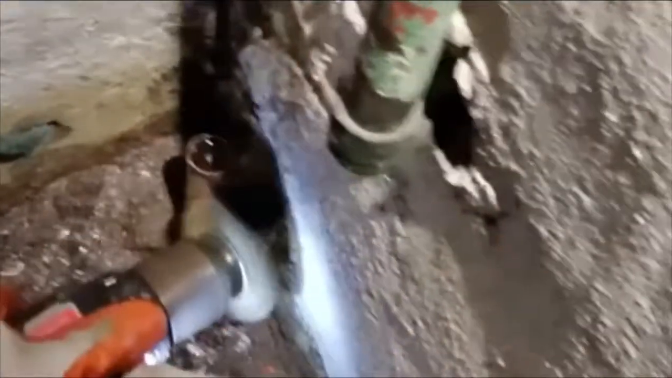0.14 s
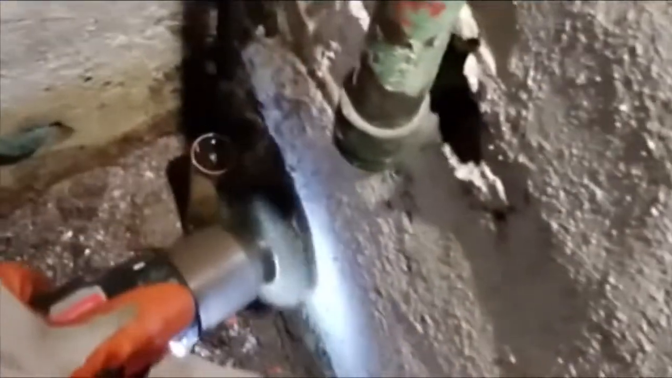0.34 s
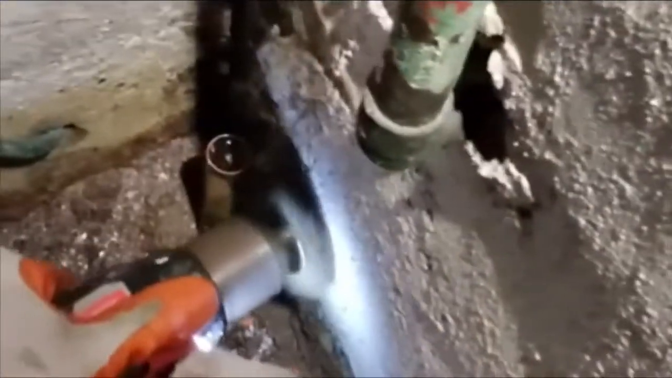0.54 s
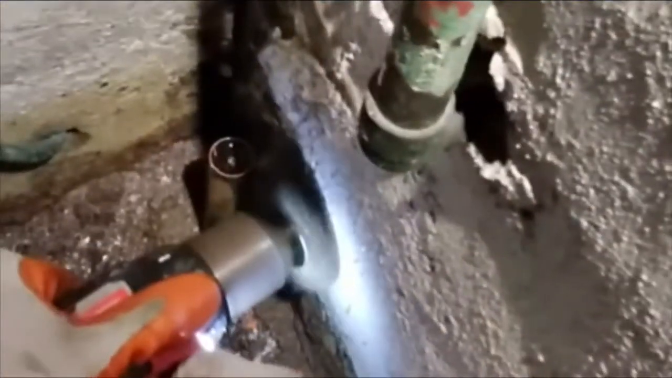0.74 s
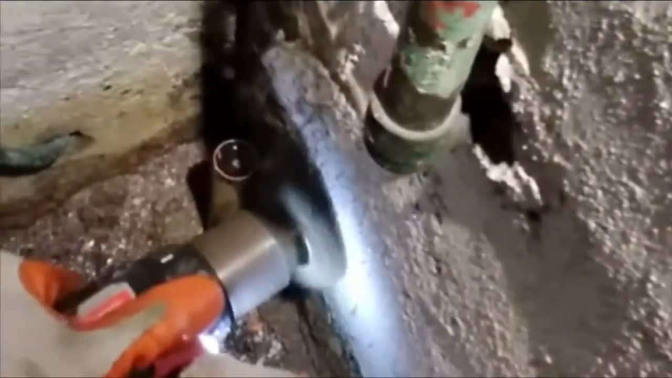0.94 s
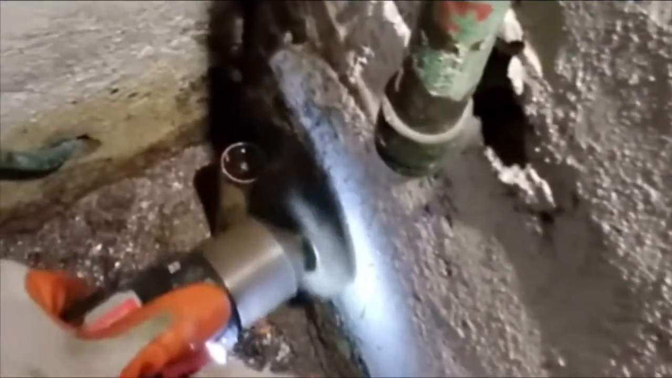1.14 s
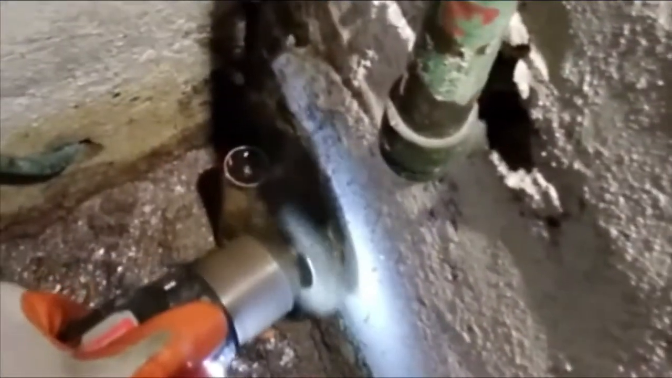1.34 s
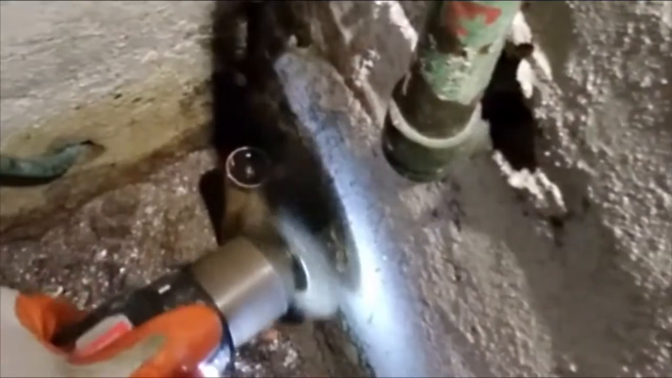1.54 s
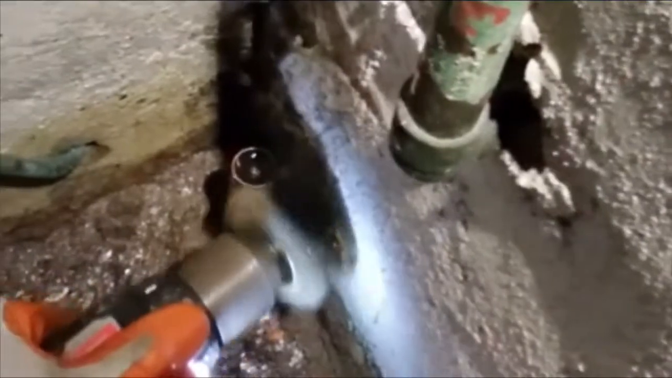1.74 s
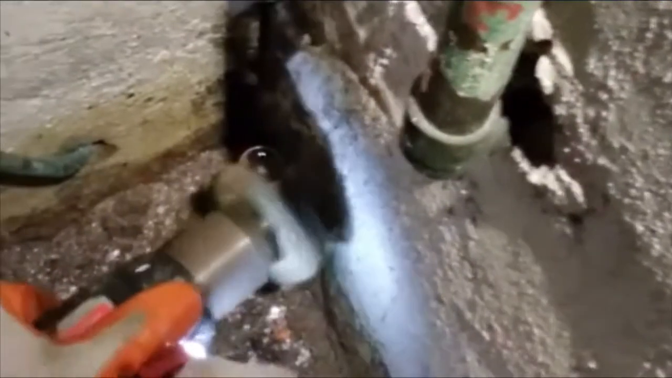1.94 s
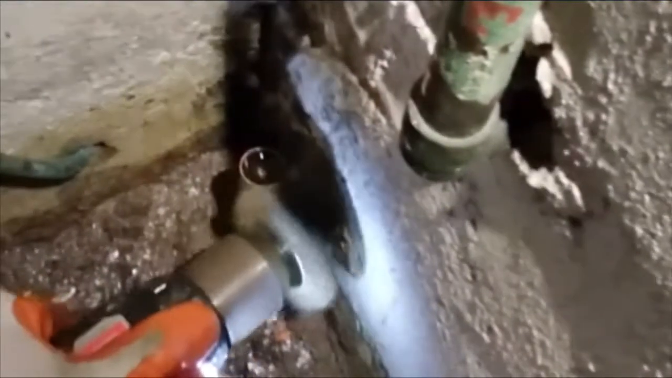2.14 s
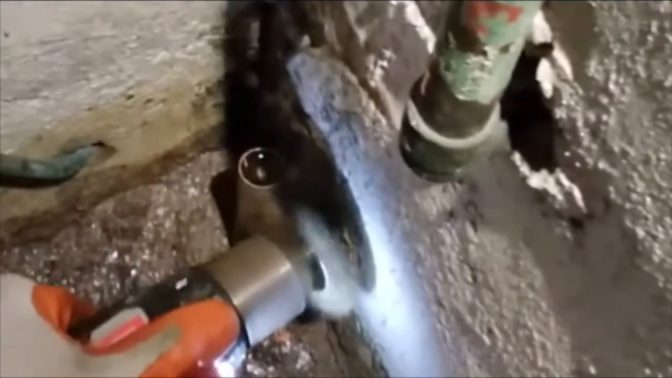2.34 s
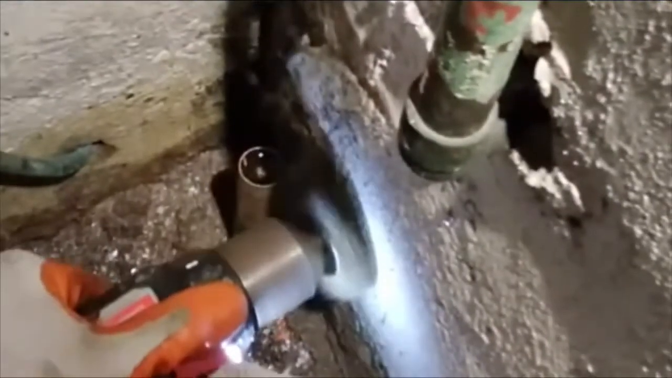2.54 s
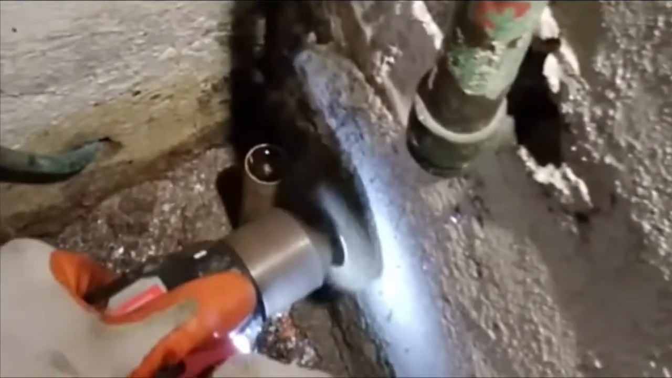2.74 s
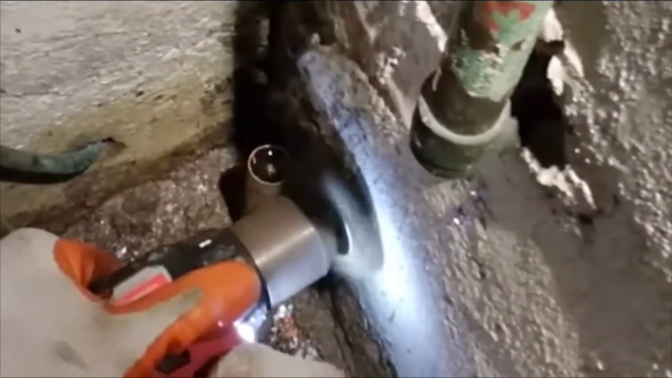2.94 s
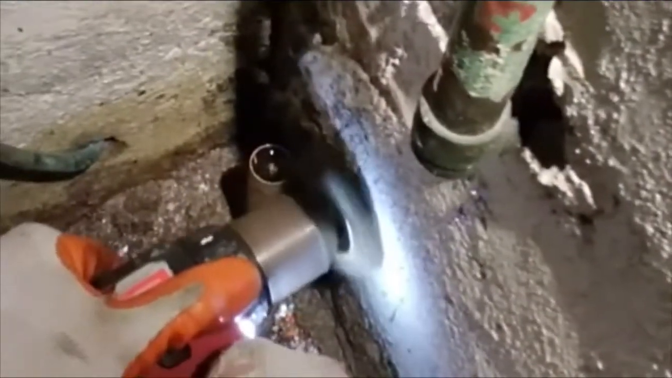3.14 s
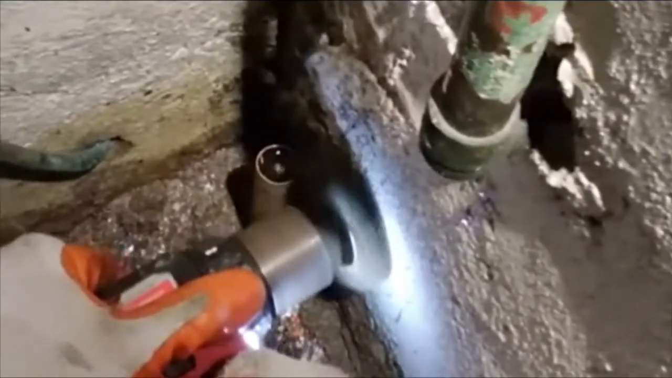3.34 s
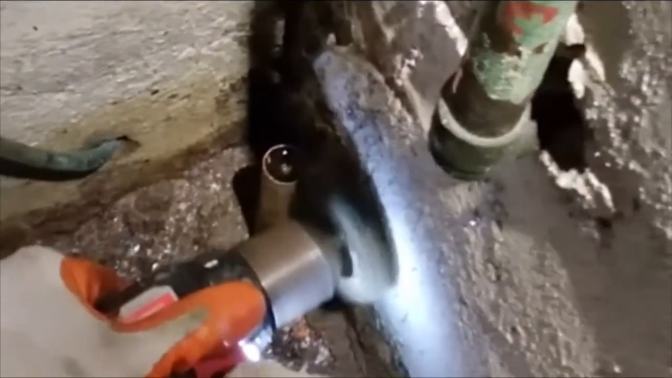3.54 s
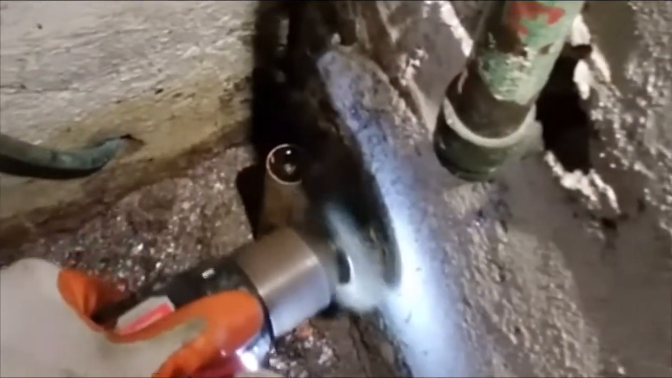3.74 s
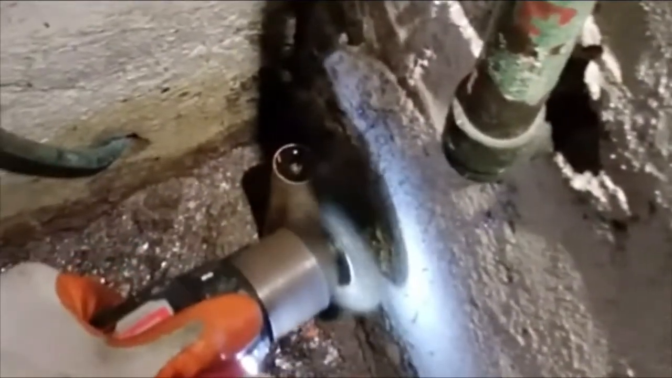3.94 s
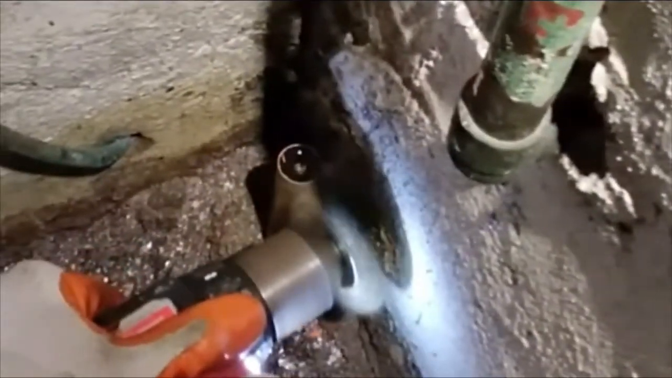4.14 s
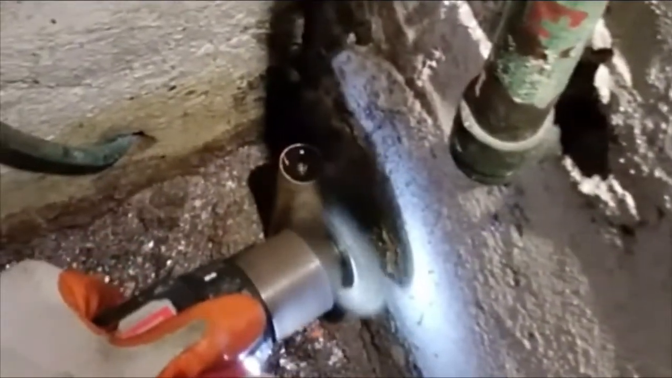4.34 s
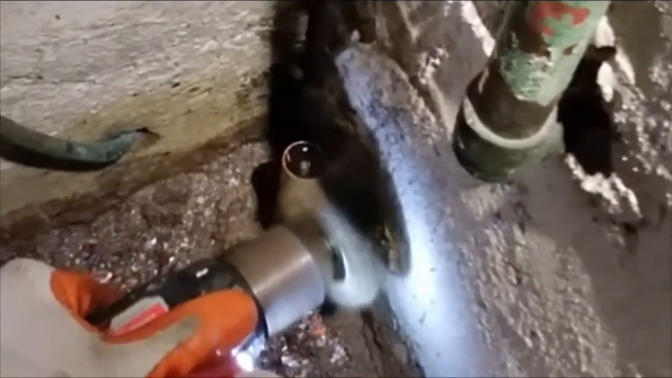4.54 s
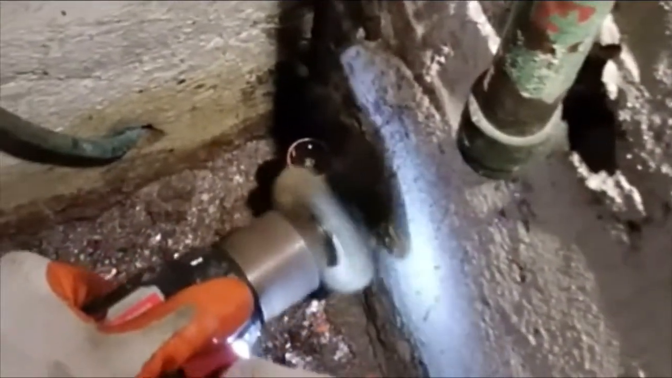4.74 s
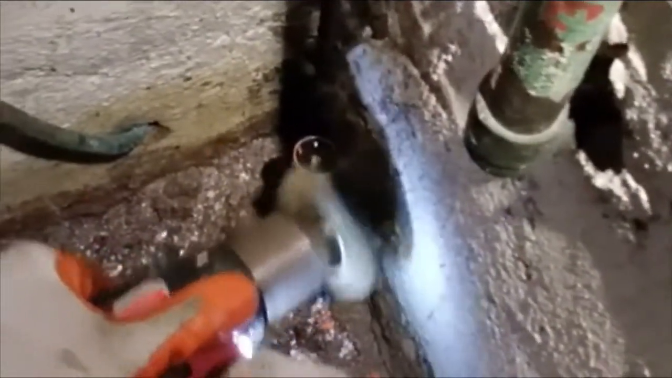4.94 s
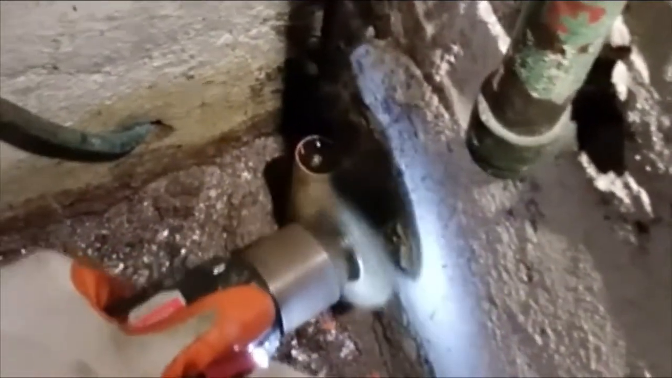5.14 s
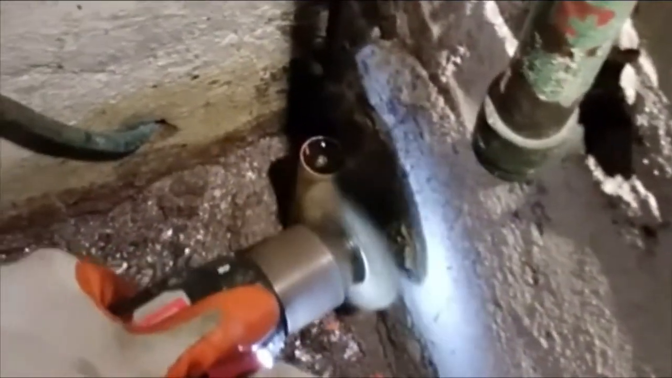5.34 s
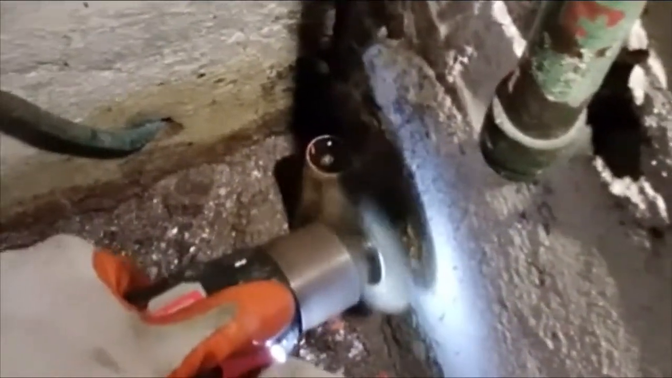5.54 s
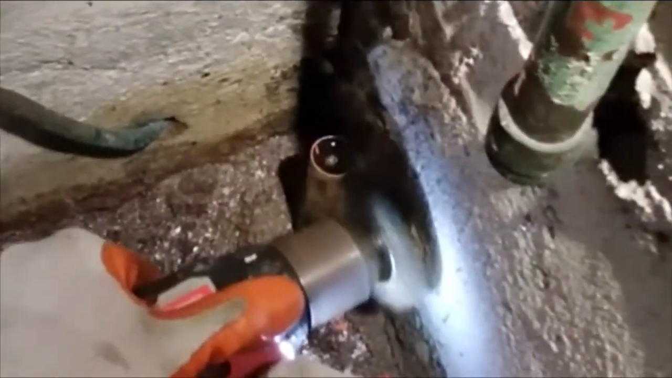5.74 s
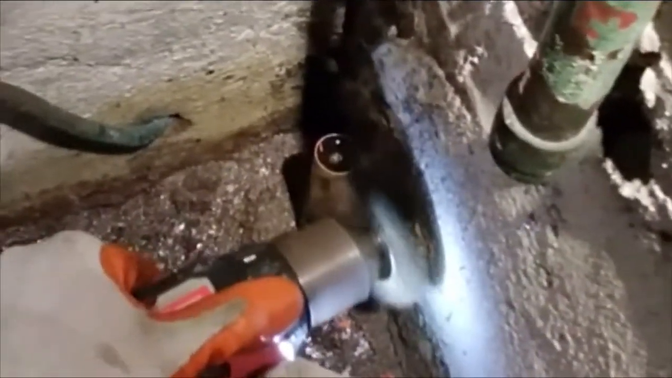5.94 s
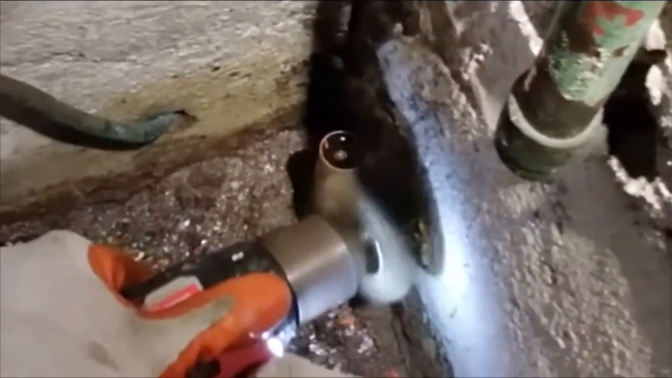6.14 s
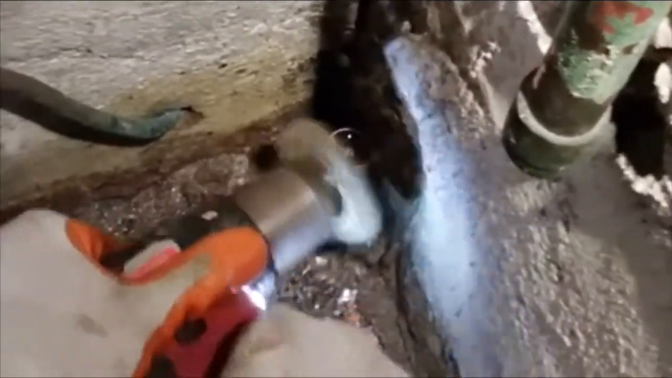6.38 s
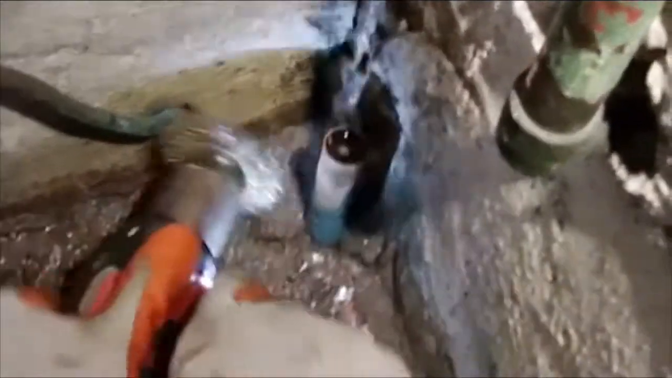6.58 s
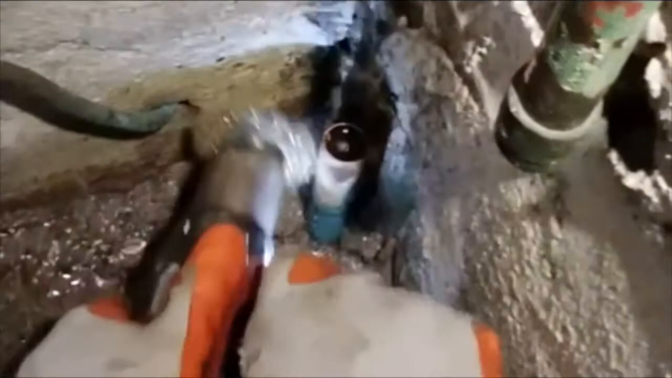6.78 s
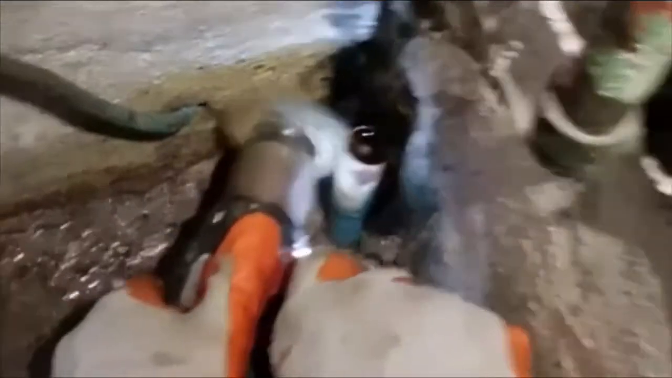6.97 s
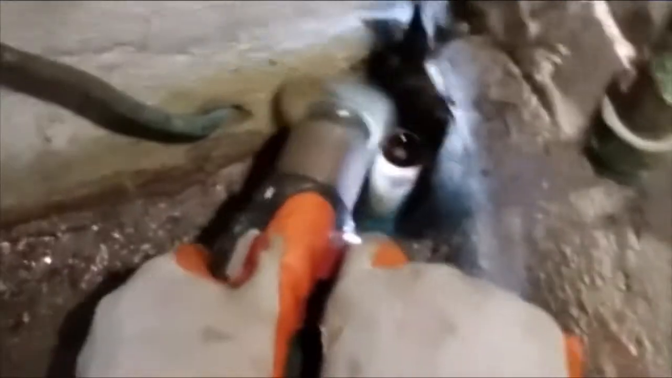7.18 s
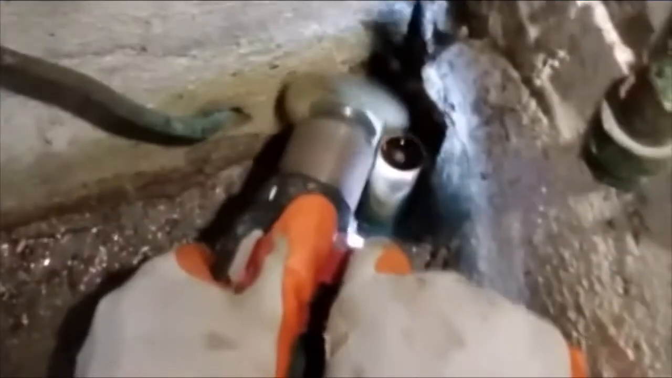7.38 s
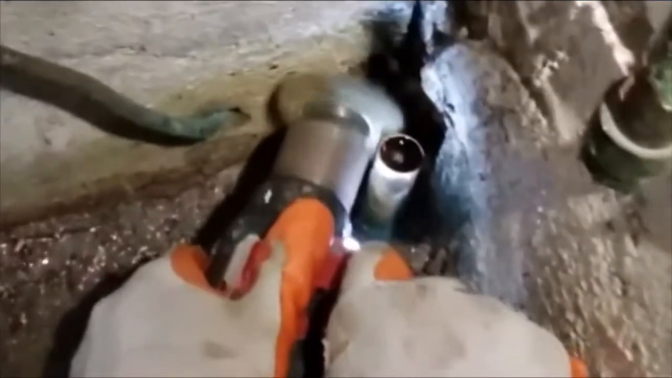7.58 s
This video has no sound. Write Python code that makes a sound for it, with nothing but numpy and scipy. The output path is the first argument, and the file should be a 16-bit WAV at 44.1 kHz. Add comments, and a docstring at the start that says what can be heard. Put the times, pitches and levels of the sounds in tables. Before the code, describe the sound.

A phone very near the tool hears a drill start with a dull knock and race up to a steady, strained whine. Wire bristles scrape and hiss against pipe, fluttering about twenty times a second, heavier around three seconds. Near the end the motor stops quickly with a clunk, leaving soft rumble, gritty rustles and one small metallic tap before whine and scraping return. The concrete corner sounds close and dry.

```python
"""A cordless drill spins a wire brush against a metal pipe stub in a concrete corner, close to a phone.
The motor whines on multiples of its shaft speed, and gear lines and a noisy rush follow that speed.
Random wire blows ring the pipe's modes, scratch and hiss, swelling once a brush turn. The drill brakes,
the still brush rustles and taps the pipe as decaying modes, and the motor spins up again.
Filtered noise makes a low outdoor rumble."""
import sys
import numpy as np
from scipy import signal
from scipy.fft import rfft, irfft, next_fast_len
from scipy.io import wavfile
from scipy.ndimage import uniform_filter1d

SR = 44100
rng = np.random.default_rng(int(sys.argv[2]) if len(sys.argv) > 2 else 0)


def transcribe(u):
    """Save the signal u as a 16-bit wav file named by the first command-line argument.

    u: samples, shape (n,) or (channels, n), limited to [-1, 1]; the rate is SR.
    q: integer samples, one column per channel.
    """
    v = np.clip(np.atleast_2d(u).T, -1, 1)
    q = np.round(v * 32767).astype(np.int16)
    wavfile.write(sys.argv[1], SR, q)


def elevation(decibels):
    """Turn decibel levels (scalar or array-like) into linear amplitude ratios."""
    levels = np.asarray(decibels, float)
    return 10 ** (levels / 20)


N = 335601
TIME_S = np.arange(N) / SR

# Trigger pulls: start_s, gears_catch_after_s, bite_within_s, brake_s, gear_rush_db (before load and speed)
TRIGGER_PULLS = [(.02, 0.01, .003, 6.478, -47), (6.998, 0.0, 0.022, 9, -46)]
# Main whine under load, at three times the shaft: time_s, pitch_hz (at full speed), level_db (before housing)
MAIN_WHINE = [(.06, 968, -36.5), (0.25, 975, -45), (0.32, 970.8, -38.5), (0.47, 965.5, -39.5),
              (0.75, 936.3, -32.5), (1.25, 931.6, -31), (1.77, 933.2, -28.5), (1.85, 941.9, -36.5),
              (2.13, 956.4, -40.5), (2.34, 956, -39.5), (2.8, 931.3, -29), (3.18, 890.3, -34.5),
              (3.81, 920.3, -33), (4.1, 927.5, -28), (4.74, 935, -29.5), (4.79, 941.4, -35.5),
              (5.26, 953.2, -38.5), (5.72, 938.2, -29.5), (5.9, 917.5, -34), (6.07, 919.9, -28.5),
              (6.31, 933.2, -32), (6.45, 963.2, -48), (7.22, 935.3, -35), (7.6, 927, -33.5)]
MAIN_ORDER = 3
FREE_HZ, FULL_LOAD_HZ = 321.86, 15.2  # shaft speed without load; its drop under a firm press


def colour(x, points):
    """Linear filtering: a gain curve, interpolated over log frequency, multiplies the spectrum."""
    hz, db = np.transpose(points)
    n = next_fast_len(N)
    log_f = np.log(np.arange(n // 2 + 1) * SR / n + 1)
    gain = elevation(np.interp(log_f, np.log(hz), db))
    return irfft(rfft(x, n) * gain, n)[..., :N]


def unit(x):
    """Normalisation of mean power: scales a signal to rms 1."""
    return x / np.sqrt(np.mean(x ** 2))


def curve(rows, off=None):
    """Linear interpolation: the columns of a table at every sample, optionally with a value outside it."""
    s, *columns = np.transpose(rows)
    return [np.interp(TIME_S, s, c, off, off) for c in columns]


def walk(rate):
    """Slow random modulation: levels held 1 / rate s and smoothed twice, of spread near 1."""
    k = int(SR / rate)
    held = np.repeat(rng.standard_normal(N // k + 1), k)
    return 1.3 * uniform_filter1d(uniform_filter1d(held, k), k)[:N]


def random_blows(per_s, spread_db, size=(2, N)):
    """Shot noise: impulses at random moments, a few much harder, independent on the two channels by default."""
    blows = (rng.random(size) < per_s / SR) * rng.standard_normal(size)
    hardness = np.minimum(rng.exponential(size=size), 5)
    return unit(blows * elevation(spread_db * hardness))


def ring(at_s, db, hz, t60):
    """Free vibration of one damped mode: a sine that falls 60 dB in t60 seconds."""
    t = np.maximum(TIME_S - at_s, 0)
    return elevation(db - 60 * t / t60) * np.sin(2 * np.pi * hz * t)


def per_run(values):
    """Piecewise constant setting: one value for each run of the motor."""
    return np.where(TIME_S < TRIGGER_PULLS[1][0], *values)


def drive():
    """Rotor inertia: speed nears its loaded value exponentially and falls linearly under the brake."""
    spin_up_s = 0.049  # time constant of the rising speed
    brake_hz_per_s, brake_s = 4300, 0.068  # the level is 20 dB down after brake_s
    loaded_hz = curve(MAIN_WHINE)[0] / MAIN_ORDER
    shaft_hz, run_db = np.zeros(N), np.full(N, -200.)
    for start, catch, bite, brake, _ in TRIGGER_PULLS:
        since = np.maximum(TIME_S - start, 0)
        braked = np.maximum(TIME_S - brake, 0)
        rising_hz = loaded_hz * (1 - np.exp(-since / spin_up_s))
        shaft_hz = shaft_hz + np.maximum(rising_hz - brake_hz_per_s * braked, 0)
        caught = np.clip((since - catch) / bite, 1e-9, 1)
        run_db = np.maximum(run_db, 20 * np.log10(caught) - 20 * (braked / brake_s) ** 3)
    slow = 1 - shaft_hz / loaded_hz  # share of the speed still missing
    load = np.maximum(FREE_HZ - loaded_hz, 0) / FULL_LOAD_HZ
    return shaft_hz, slow, load, run_db


def order_gains(shaft_hz, slow, load):
    """Order analysis: each multiple of the shaft has its own level, set by load, speed and resonance."""
    # Housing resonances that shape the main whine as it sweeps through: centre_hz, width_hz, lift_db
    housing = [(150, 134, -21), (657, 140, 8)]
    # Multiples of the shaft heard beside the main whine
    orders = 1, 5, 6, 9, 12, 20, 21
    # For each of these: first_run_db, second_run_db, lost_at_full_load_db, waver_db
    order_levels = [(-45.5, -46, 2, 0.3), (-46.5, -44, 0.5, 2.2), (-48.5, -40.5, 1, 3),
                    (-45, -60, -0.5, 2.5), (-49.5, -64, 0, 5.5), (-58, -44, -4, 3.5), (-54, -50, 5, 2.5)]
    # For each of these, spells in which it stands out: start_s, end_s, level_db (before waver)
    spells_by_order = [
        [],
        [(2.1, 2.45, -54), (5.05, 5.6, -46)],
        [(2.104, 2.447, -50), (5.05, 5.5, -53)],
        [(.25, .7, -61)],
        [(.27, .37, -47), (.6, 1.7, -53), (2.1, 2.8, -52.5)],
        [(1.9, 2.2, -47), (4.8, 5.9, -44.5)],
        [(2.1, 2.45, -47), (3.75, 4.8, -42.5), (5.4, 6.35, -43.5)],
    ]
    slow_loss_db = 35  # what the steady orders lack at standstill
    brake_yelp_db, yelp_s = 14, 0.01  # the main whine peaks yelp_s after the brake
    lift_db = sum(db / (1 + ((MAIN_ORDER * shaft_hz - hz) / w) ** 2) for hz, w, db in housing)
    first_brake_s = TRIGGER_PULLS[0][-2]
    yelp_db = brake_yelp_db * np.exp(-((TIME_S - first_brake_s) / yelp_s - 1) ** 2)
    main_db = curve(MAIN_WHINE)[1]
    gains = [(MAIN_ORDER, elevation(main_db + lift_db + yelp_db + walk(40)))]
    for order, (*run, lost_db, waver_db), spells in zip(orders, order_levels, spells_by_order):
        sings = sum(elevation(db) * np.interp(TIME_S, [a - .08, a + 0.095, b - .08, b + 0.054], [0, 1, 1, 0])
                    for a, b, db in spells)
        steady = elevation(per_run(run) - lost_db * load - slow_loss_db * slow)
        gains.append((order, (steady + sings) * elevation(waver_db * walk(12))))
    return gains


def shaft_whine(shaft_hz, slow, load, run_db, turns, shaft_phase):
    """Harmonic synthesis: sines on the shaft orders, modulated in level once a brush turn."""
    # the housing shakes once a brush turn, at a drifting angle
    shake_db = 1.28 * np.cos(2 * np.pi * turns + 1.54 * walk(3))
    whine = 0
    for order, gain in order_gains(shaft_hz, slow, load):
        blur = order * walk(40) / 14  # random phase broadens the line
        whine = whine + np.sqrt(2) * gain * elevation(shake_db + run_db) * np.sin(order * shaft_phase + blur)
    return whine


def gear_lines(rush_db, shaft_phase):
    """Gear meshing: lines locked to the shaft, roughened by random level and phase, plus a brief singing gear."""
    # Rough gearbox lines: times_the_shaft, level_db (against the gear rush)
    mesh = [(1.38, -13), (2.0, -14), (2.11, -4.5), (2.47, -3.5), (4.0, -12), (4.94, -2.5), (6.22, -10),
            (7.41, -1.5), (8.22, -6), (18.0, 0)]
    # A gear sings at 11 times the shaft while the motor picks up again: time_s, level_db
    pick_up = [(7.005, -58), (7.014, -35), (7.024, -38), (7.036, -44), (7.052, -35), (7.066, -44),
               (7.08, -60)]
    lines = 0
    for order, db in mesh:
        level = elevation(rush_db + db + 4.5 * walk(20))
        lines = lines + level * np.sin(order * shaft_phase + 0.52 * walk(20))
    return lines + np.sqrt(2) * elevation(curve(pick_up, off=-200)[0]) * np.sin(11 * shaft_phase)


def gear_rush(throb_db):
    """Filtered shot noise: gear teeth and cooling air make a dense rush, throbbing with the brush."""
    # Colour of the rush: pitch_hz, relative_db
    gear_colour = [(150, -5), (400, -4), (1200, 2.5), (1700, 4), (2250, 2), (3100, 2), (3400, -3),
                   (4100, -2), (4750, 1), (5500, -3.5), (6300, 5), (7000, -2.5), (9500, -5), (14000, -4)]
    rush = unit(colour(random_blows(9000, 0.99), gear_colour))
    return rush * elevation(13 + 0.94 * throb_db + 0.37 * walk(14))


def motor(shaft_hz, slow, load, run_db, turns, throb_db):
    """Rotating machinery: one jittering shaft phase drives whine and gear lines; load and speed lift the rush."""
    shaft_phase = 2 * np.pi * np.cumsum(shaft_hz * (1 + 0.00205 * walk(60))) / SR
    load_db = 3.5 * np.minimum(load, 1)
    speed_db = 6 * np.log10(shaft_hz / FREE_HZ + .01)
    rush_db = per_run([run[-1] for run in TRIGGER_PULLS]) + load_db + run_db + speed_db
    tones = shaft_whine(shaft_hz, slow, load, run_db, turns, shaft_phase) + gear_lines(rush_db, shaft_phase)
    # the tones go on the first channel only
    return tones * np.array([[1], [0]]) + elevation(rush_db) * gear_rush(throb_db)


def same_wires(turns):
    """Cyclic excitation: the same wires come round each turn, so the blows on the pipe partly repeat."""
    per_turn = SR // 21  # samples in a turn at about 21 turns a second
    blows = random_blows(2000, 1.9, size=(N // per_turn + 9, per_turn))
    blows = signal.lfilter([1], [1, -0.76], blows, axis=0).ravel()  # each turn keeps 0.76 of the last
    return blows[np.round((turns + 2) * per_turn).astype(int)]


def pipe_ring(turns):
    """Modal resonance: the wire blows excite the modes of the pipe and its wall, in alternating sign."""
    # Modes of pipe and wall: pitch_hz, width_hz, relative_db (per root width)
    pipe_modes = [(426, 23, -3), (513, 32, -0.5), (591.5, 34, -1), (669, 60, 1.5), (824, 137, 1),
                  (1150, 720, -15.5), (1805, 300, -8), (2203, 147, -3), (2572, 51, -5.5),
                  (4620, 150, -15.5), (5960, 240, -15.5)]
    blows = same_wires(turns)
    pipe = 0
    for k, (hz, width, db) in enumerate(pipe_modes):
        mode = unit(signal.lfilter(*signal.iirpeak(hz, hz / width, SR), blows))
        pipe = pipe + (-1) ** k * elevation(db) * mode * np.sqrt(width)
    return unit(pipe)


def brush(run_db, turns, throb_db):
    """Frictional excitation: bristles ring, scratch and hiss, swell once a turn and flicker as the hand shakes."""
    # Brush on the pipe, before the offsets and swells below: time_s, pipe_ring_db, scratch_db, hiss_db
    strokes = [(0.034, -44, -53, -50), (0.07, -36, -42, -41), (.2, -55, -41, -37),
               (0.35, -38.5, -37.5, -35), (1.04, -36, -34.5, -31), (1.5, -35.5, -38, -35.5),
               (1.77, -40, -37.5, -34.5), (1.95, -37.5, -34, -31.5), (2.15, -46, -38.5, -34),
               (2.28, -40, -37, -36), (2.55, -37, -38.5, -34), (2.85, -35, -31, -31.5),
               (3.1, -33, -28, -27), (3.33, -32.5, -29.5, -31), (3.46, -34.5, -35.5, -31.5),
               (4.16, -36.5, -39, -35), (4.8, -40, -36.5, -32.5), (4.93, -40, -33, -30.5),
               (5.07, -48, -39.5, -35.5), (5.26, -42, -40, -36.5), (5.9, -34.5, -37, -34),
               (6.24, -39.5, -40.5, -33.5), (6.35, -44, -32, -31.5), (6.465, -58, -45, -37),
               (6.49, -35, -41, -36), (7.0, -40.5, -34.5, -36), (7.117, -41, -33, -31),
               (7.22, -45, -37.5, -33.5), (7.61, -42, -36.5, -32)]
    # Colour of the scratch: pitch_hz, relative_db
    scratch_colour = [(1000, -50), (3000, -10.5), (4400, -16.5), (5500, -26), (7200, -7.5), (8300, -0.5),
                      (9500, 2), (10800, 0), (13000, -13), (15000, -15)]
    # Colour of the hiss: pitch_hz, relative_db
    hiss_colour = [(3000, -23.5), (7000, -13), (10500, -14), (12000, -2), (13100, 0.5), (15000, -3.5)]
    pipe_db, scratch_db, hiss_db = curve(strokes) + run_db
    shake = walk(12)
    scratch = unit(colour(random_blows(14000, 2.1), scratch_colour)) * elevation(scratch_db + 4.5)
    hiss = unit(colour(random_blows(16000, 0.81), hiss_colour)) * elevation(hiss_db + 7)
    pipe = pipe_ring(turns) * elevation(pipe_db + 1.58 * throb_db + 1.06 * shake)
    return pipe + (scratch + hiss) * elevation(1.3 * throb_db + 0.62 * shake + 0.71 * walk(25.14))


def body_knocks():
    """Impulse response: dull knocks of the drill body and brake, each one damped mode."""
    # Knocks: time_s, peak_db, pitch_hz, t60_s
    thuds = [(0.0, -27, 259, 0.17), (.032, -29, 706, 0.035), (.091, -27.5, 193, 0.092),
             (4.701, -31, 150, 0.12), (6.483, -27, 838, 0.12), (6.53, -31, 900, .05)]
    return sum(ring(*row) for row in thuds)


def brush_tap():
    """Impact: the still brush taps the pipe and bounces, ringing damped modes under a decaying noise crack."""
    # Tap and bounces: time_s, peak_db (before the mode levels)
    bounces = [(6.8463, -32), (6.8471, -23.5), (6.8490, -38)]
    # Modes of a tap: pitch_hz, relative_db, t60_s
    tap_modes = [(270, -12, 0.09), (650, -9, 0.085), (915, -9, 0.058), (1170, -17, 0.056), (1440, -12, .03),
                 (1920, -1.5, 0.06), (2460, -3, 0.038)]
    t = TIME_S - 6.846
    crack = (t > 0) * rng.standard_normal(N) * elevation(-23.5 - 60 * np.maximum(t, 0) / 0.054)
    crack = colour(crack, [(200, -14), (1000, 10), (3000, -6), (5000, -13), (14000, -6)])
    modes = sum((-1) ** k * ring(s, tap_db + db, hz, t60)
                for s, tap_db in bounces for k, (hz, db, t60) in enumerate(tap_modes))
    return modes + crack


def rustles():
    """Dry friction: the still brush drags over grit, as coloured shot noise that starts quickly and fades."""
    # Drags: start_s, end_s, level_db (at the onset)
    drags = [(6.65, 6.69, -46), (6.80, 6.842, -41), (6.915, 6.925, -51)]
    envelope = 0
    for start, end, db in drags:
        envelope = envelope + elevation(db) * np.interp(TIME_S, [start, start + .006, end, end + .02], [0, 1, .7, 0])
    grit = colour(random_blows(6500, 2.1), [(1500, -20), (6000, -9), (8500, 4), (12500, 5), (14000, 0)])
    return envelope * unit(grit)


def rumble():
    """Filtered noise: distant low noise and faint air, with a narrow resonance for a wavering hum."""
    # Colour of the outdoor noise (pitch_hz, relative_db), and its overall level in dB
    outdoor_colour, outdoor_db = [(15, -36), (25, -13), (92, -2.5), (145, -8), (222, -10.5), (378, -9.5),
                                  (468, -15), (2020, -19.5), (3440, -29), (3930, -23), (5000, -32),
                                  (12700, -27), (14500, -32)], -43.5
    hum_hz, hum_width_hz, hum_db = 105.7, 5.3, -56
    hum = signal.lfilter(*signal.iirpeak(hum_hz, hum_hz / hum_width_hz, SR), rng.standard_normal(N))
    outdoors = unit(colour(rng.standard_normal((2, N)), outdoor_colour))
    return outdoors * elevation(outdoor_db + 1.5 * walk(5)) + unit(hum) * elevation(hum_db)


def scene():
    """Superposition on two channels: the noisy sounds are drawn independently for each, knocks and rings are
    shared, and the tones sit on the first alone."""
    # The brush runs out of true; depth of its throb: time_s, depth_db (scaled for each sound)
    throb_depth = [(.25, .5), (.45, 1.6), (.7, 0.5), (1.3, 1.3), (1.55, .8), (1.95, 1.5), (2.3, 0.9),
                   (2.55, 2), (2.8, .5), (3.35, 0.3), (3.7, 2), (3.95, 0.7), (4.9, 1.6), (5.4, 0.1),
                   (5.85, 2), (6.4, 1), (7.2, .6)]
    gear_ratio = 14.75  # shaft turns in a brush turn
    shaft_hz, slow, load, run_db = drive()
    # the spot where the brush touches wanders a little
    turns = np.cumsum(shaft_hz) / SR / gear_ratio + .12 * walk(2)
    throb_db = curve(throb_depth)[0] * np.cos(2 * np.pi * turns)
    drill = motor(shaft_hz, slow, load, run_db, turns, throb_db) + brush(run_db, turns, throb_db)
    return drill + body_knocks() + brush_tap() + rustles() + rumble()


def top_cut(x):
    """Nothing passes above the cut-off."""
    return signal.sosfilt(signal.butter(12, 14910, fs=SR, output="sos"), x)


def record(dry):
    """Interchannel coherence: each port has its own colour; in the treble the right one mixes in the
    independent second channel."""
    # The two microphone ports: pitch_hz, left_db, right_db, likeness (0-1), right_phase_rad
    port_response = [(2200, 0.0, -0.0, 1.0, 0.0), (2600, 0.4, -0.5, 0.6, -0.1),
                     (3000, 0.6, -0.7, 0.37, -0.8), (3400, 1.3, -1.8, 0.21, -1.1),
                     (3800, 1.6, -2.6, 0.58, -2.6), (4200, -0.9, 0.7, 0.54, -3.1),
                     (4700, -8.1, 2.7, 0.28, -4.4), (5100, -9.8, 2.8, 0.22, -5.1),
                     (5450, -12.3, 2.9, 0.03, -5.8), (5900, -4.1, 2.1, 0.28, -4.9),
                     (6500, 0.2, -0.3, 0.84, -6.1), (7000, 1.2, -1.6, 0.32, -5.6),
                     (7600, 0.6, -0.7, 0.43, -4.5), (8300, 1.9, -3.4, 0.25, -5.3),
                     (9400, 1.5, -2.4, 0.37, -4.9), (10100, 2.7, -8.4, 0.14, -5.8),
                     (10800, 2.3, -5.1, 0.31, -5.2), (11400, 2.9, -11.9, 0.11, -5.4),
                     (12000, 2.7, -9.2, 0.29, -4.8), (12600, 2.9, -14.5, 0.07, -6.3),
                     (13200, 2.7, -8.5, 0.33, -9.8), (14000, 2.1, -4.4, 0.44, -9.8)]
    # Narrow dips of the ports: centre_hz, width_hz, left_db, right_db
    port_dips = [(5400, 130, -18, 0), (3400, 150, 0, -6), (10150, 110, 0, -8), (11450, 130, 0, -10),
                 (12650, 110, 0, -10)]
    top_hz, bass_cut_hz = 14140, 70
    hz, left_db, right_db, like, phase = np.transpose(port_response)
    n = next_fast_len(N)
    f = np.arange(n // 2 + 1) * SR / n
    like = np.interp(f, hz, like)
    main, twin = rfft(dry, n)
    dips_db = sum(np.outer(db, 1 / (1 + ((f - at) / w) ** 2)) for at, w, *db in port_dips)
    left = elevation(np.interp(f, hz, left_db)) * main
    right = like * main + np.sqrt(1 - like ** 2) * twin  # power-preserving mix of the two channels
    right = right * elevation(np.interp(f, hz, right_db)) * np.exp(1j * np.interp(f, hz, phase))
    ports = irfft(np.array([left, right]) * elevation(dips_db), n)[:, :N]
    ports = signal.sosfilt(signal.ellip(10, .3, 70, top_hz, fs=SR, output="sos"), ports)
    ports = signal.sosfilt(signal.butter(2, bass_cut_hz, "high", fs=SR, output="sos"), ports)
    return top_cut(ports)


dry = scene()
out = record(dry)
transcribe(out)
```